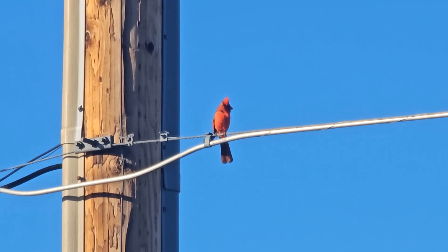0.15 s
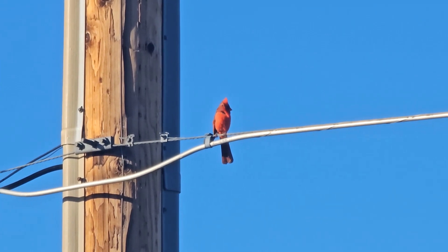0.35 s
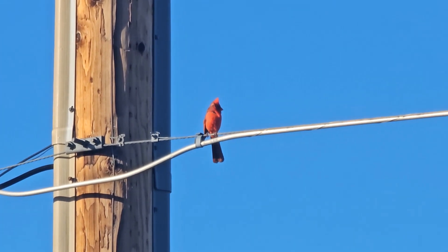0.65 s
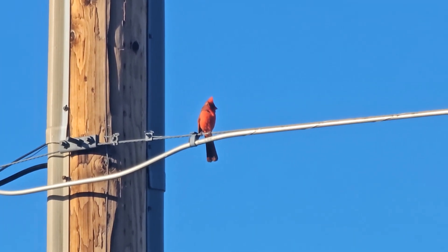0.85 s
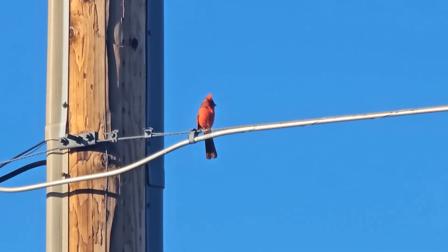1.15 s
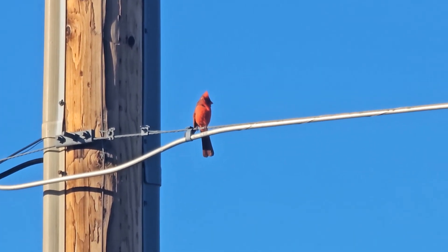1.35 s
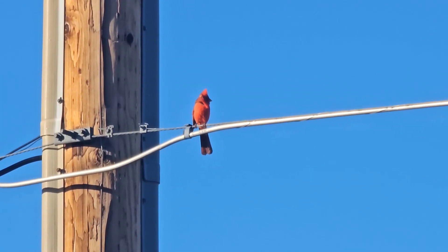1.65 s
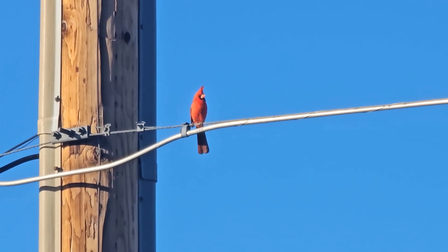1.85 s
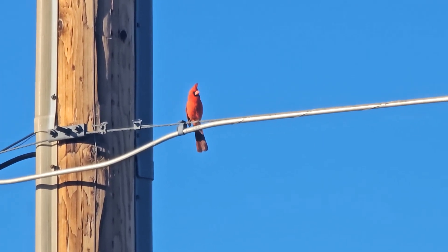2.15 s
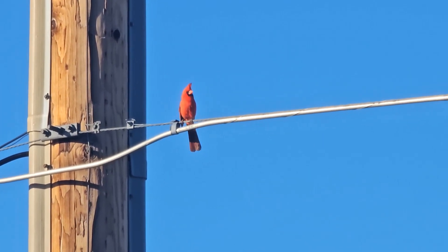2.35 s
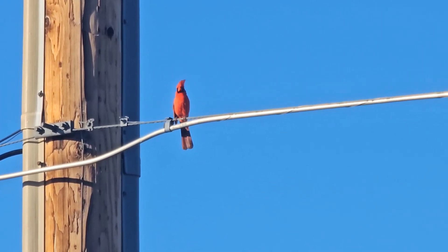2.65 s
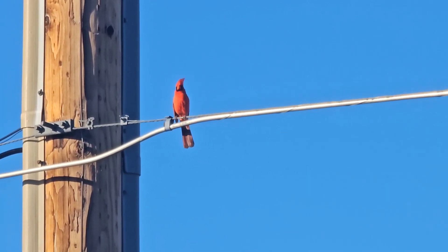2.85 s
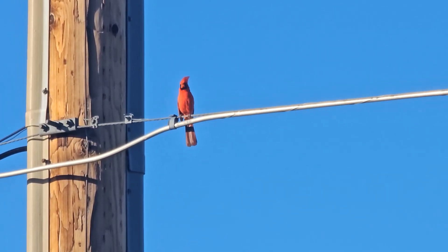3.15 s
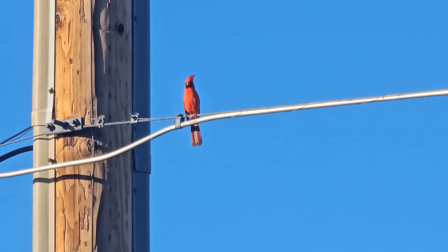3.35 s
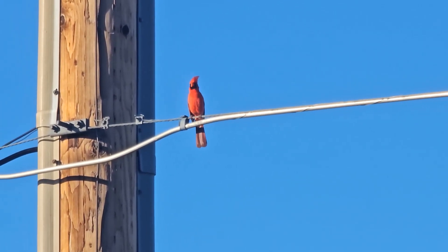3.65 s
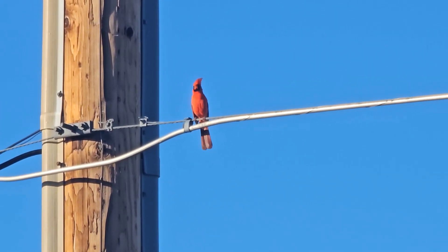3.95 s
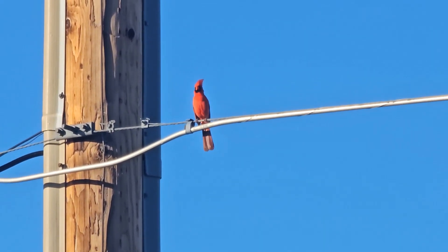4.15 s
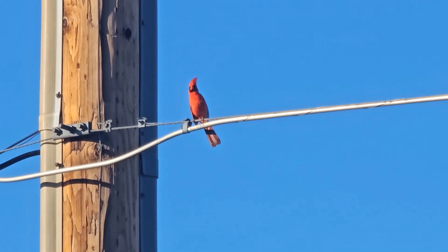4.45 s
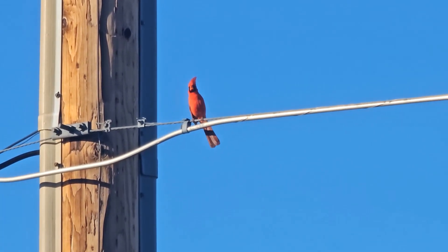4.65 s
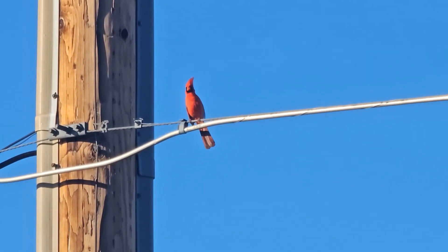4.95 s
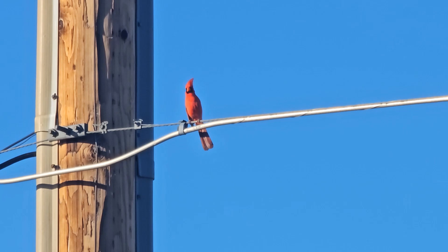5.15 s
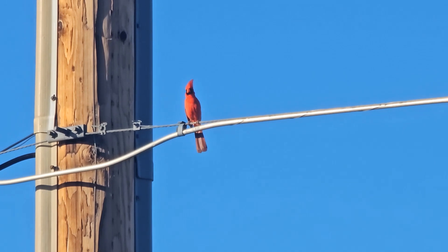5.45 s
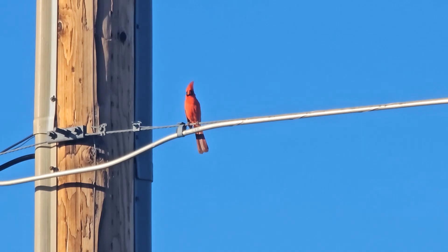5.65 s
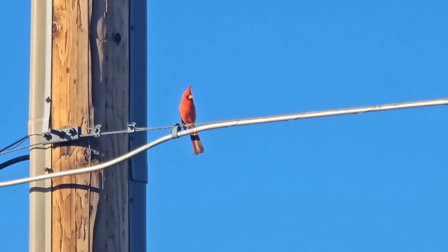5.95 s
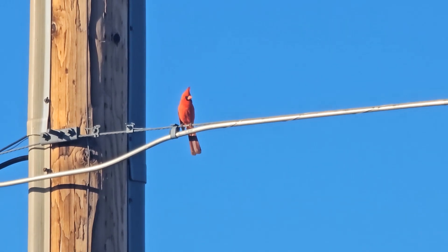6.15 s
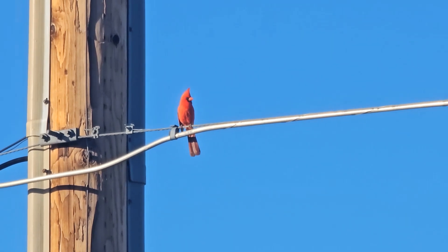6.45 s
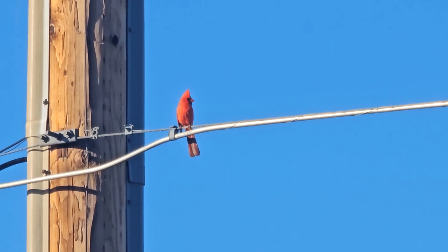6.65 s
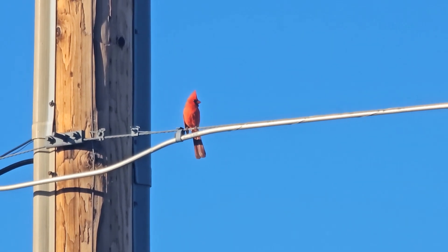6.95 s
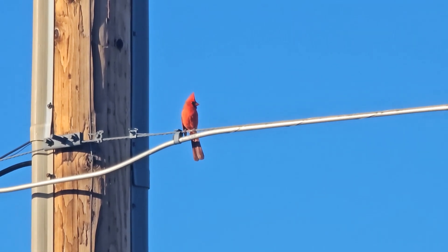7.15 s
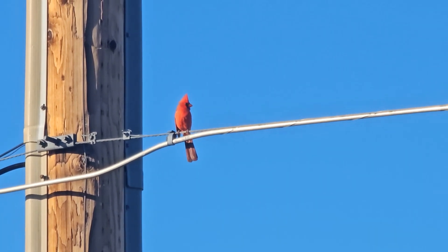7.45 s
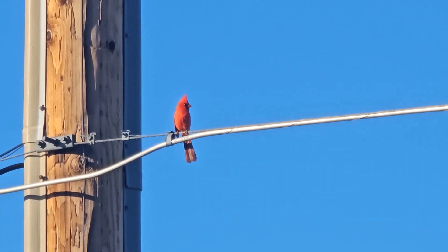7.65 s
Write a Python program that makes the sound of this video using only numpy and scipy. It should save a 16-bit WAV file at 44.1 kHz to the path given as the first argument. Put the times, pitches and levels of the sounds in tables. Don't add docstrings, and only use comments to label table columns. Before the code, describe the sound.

Outdoors, a low engine drone and distant traffic rumble while other birds twitter faintly far off and small ticks come from the handheld microphone. After about two seconds a cardinal gives three thin, high rising whistles, each louder, then ten bright down-slurred whistles, each with a sharp chip in front, about four per second. The song stops before six seconds, leaving soft rumble and distant twitter.

```python
import sys
import numpy as np
from scipy import signal
from scipy.fft import rfft, irfft, next_fast_len
from scipy.io import wavfile
from scipy.ndimage import uniform_filter1d

SR = 44100
rng = np.random.default_rng(int(sys.argv[2]) if len(sys.argv) > 2 else 0)


def nominal_scale(level):
    x = np.asarray(level, float) / 20
    return 10 ** x


def generate_wav(signal):
    frames = np.transpose(np.atleast_2d(signal))
    scaled = np.clip(frames, -1, 1) * 32767
    pcm = np.round(scaled).astype(np.int16)
    wavfile.write(sys.argv[1], SR, pcm)


N = 344421
FAST_N = next_fast_len(N, real=True)

# start_s, mark_hz, level_db
RISES = [
    (2.302, 5834, -44),
    (2.782, 6000, -39.5),
    (3.18, 6100, -36),
]
# start_s, mark_hz, level_db
HOOKS = [
    (2.612, 3666, -51),
    (3.008, 3717, -44),
]
# start_s, mark_hz, level_db
UNDERS = [(3.1, 2286, -53)]
# start_s, mark_hz, level_db
LEADS = [(3.368, 2906, -28.5), (3.613, 2840, -27)]
# start_s, mark_hz, level_db
SNAPS = [(3.309, 5034, -28), (3.546, 4960, -27.5)]
# start_s, mark_hz, level_db
ARCHES = [(3.856, 2835, -26), (4.091, 2844, -26), (4.326, 2763, -26), (4.56, 2808, -25.5),
          (4.795, 2795, -25), (5.029, 2812, -25.5), (5.263, 2789, -25.5), (5.5, 2750, -27.5)]
# start_s, mark_hz, level_db
CHIPS = [(3.783, 4090, -33.5), (4.023, 3940, -34), (4.256, 3940, -33.5), (4.491, 4060, -33),
         (4.726, 4040, -33), (4.958, 4100, -30.5), (5.193, 3990, -33), (5.43, 4010, -32.5)]
# from_mark_s, pitch_share, level_db
RISE_SHAPE = [
    (-.09, .635, -27.5),
    (-.06, .725, -14),
    (-.03, .825, -5),
    (0, 1, 0),
    (.022, 1.08, -2.5),
    (.042, 1.11, -23),
]
# from_mark_s, pitch_share, level_db
HOOK_SHAPE = [(0, 0.96, 3), (.008, 0.99, -6.5), (.028, .88, -2), (.043, .725, -6), (.056, .68, -9.5),
              (.066, 0.77, -10)]
# from_mark_s, pitch_share, level_db
UNDER_SHAPE = [(0, .9, -14), (.012, .93, -3), (.025, .97, -1), (.04, 1.05, -4), (.052, 1.08, -13)]
# from_mark_s, pitch_share, level_db
LEAD_SHAPE = [(-.074, .86, -29), (-.06, .83, -18.5), (-.046, .76, -21.5), (-.036, .73, -16),
              (-.028, .76, -11)]
# from_mark_s, pitch_share, level_db
SNAP_SHAPE = [(-.012, .74, -15), (-.006, .86, -10), (-.002, 0.99, -6), (.001, 0.97, 1), (.008, .97, -11),
              (.015, 0.82, -23), (.021, .8, -26)]
# from_mark_s, pitch_share, level_db
ARCH_SHAPE = [(-.048, 0.62, -35), (-.04, 0.67, -16), (-.02, .84, -8.5), (-.01, .935, -9.5),
              (-.002, 0.99, -2.5), (.01, 0.98, -8.5), (0.023, .84, -12), (.05, .667, -11.5),
              (.093, .485, -26)]
# from_mark_s, pitch_share, level_db
CHIP_SHAPE = [(-.013, .5, -21), (-.008, .68, -21.5), (-.004, 0.97, -10), (-.001, 1.012, 2.5),
              (.001, 1.15, -9.5), (.003, 1.3, -7.5), (.006, 1.5, -10.5), (.01, 1.53, -24.5)]
RISE_OVERTONES_DB = [-19.5, -52.5, -47, -60, -60, -60]
ARCH_OVERTONES_DB = [-40, -35.5, -56, -42, -56, -48.5]
CHIP_OVERTONES_DB = [-21, -25, -44, -65, -61, -65]
# overtones_db, flutter_share, breath_db
RISE_VOICE = (RISE_OVERTONES_DB, .006, -38)
SLUR_VOICE = (ARCH_OVERTONES_DB, .0049, -39)
SNAP_VOICE = (CHIP_OVERTONES_DB, .015, -33)
CHIP_VOICE = (CHIP_OVERTONES_DB, .07, -19)
# freq_hz, gain_db
BEAK = [(3000, 18.5), (4400, 11.5), (5100, 4), (6000, -17), (8500, -5.5), (11500, 0.2), (15000, -4.5)]
ECHO_MS = [3.1, 2.75]
ECHO_DB = [-5, -1]
# freq_hz, left_db, right_db, left_lead_rad
PORTS = [(1656, -2.5, -2, .01), (2900, 8, 7.5, .1), (4100, 3.5, 10.5, 2.2), (4800, 1.5, 8.5, 2.2),
         (5650, 3, -5.5, 2.2), (6620, 3, -10, 3.2), (8400, 6.5, -12, 3.6), (11600, -3.5, 8, 4),
         (15000, 1.5, 1, 2.8)]
# level_db, first_s, t60_s
YARD = [
    (-11.5, .004, .08),
    (-12.5, .015, .3),
    (-26, .05, 1.1),
]

# start_s,
# length_s, first_hz, last_hz, level_db
FAR = [(.058, .04, 4010, 4880, -63), (.1, 0.056, 4300, 3530, -64.5), (.662, .03, 4150, 3950, -62),
       (.705, .035, 3110, 3000, -62.5), (.728, .03, 4350, 4700, -62), (.735, .02, 3000, 2500, -62),
       (.768, 0.027, 2490, 3250, -56.5), (.792, 0.064, 3200, 2960, -59), (.775, .025, 4280, 4100, -62.5),
       (.805, .015, 4100, 4480, -61.5), (.905, 0.051, 2050, 3300, -61), (.965, .02, 2400, 3000, -59),
       (.983, 0.019, 3400, 5070, -56), (1.003, .012, 4910, 4060, -58.5), (1.012, .022, 3990, 4300, -56.5),
       (1.0, 0.084, 2900, 3300, -64), (1.12, .03, 2770, 2900, -63.5), (1.15, 0.048, 3100, 4700, -63),
       (1.212, .042, 4000, 3900, -60), (1.31, 0.035, 3550, 3400, -62.5), (1.35, .022, 3780, 4150, -59),
       (1.368, 0.019, 4070, 3880, -54.5), (1.378, .02, 3700, 3150, -63), (1.392, .025, 3150, 3150, -59.5),
       (1.42, .03, 2800, 3100, -64), (1.94, .02, 4300, 4800, -55.5), (1.96, 0.052, 4750, 4330, -58),
       (2.0, .045, 4100, 2960, -58), (2.06, .025, 3300, 3330, -61.5), (2.105, 0.027, 4400, 4250, -59),
       (2.125, .04, 3700, 2900, -57.5), (2.16, .025, 2610, 2580, -58.5), (2.15, .03, 4250, 3880, -60),
       (2.42, .03, 4400, 4700, -66), (2.45, .03, 4280, 4000, -62.5), (2.62, .025, 4100, 4400, -59),
       (2.66, 0.037, 3400, 2800, -53), (2.675, 0.022, 3600, 3700, -55),
       (3.7, .02, 4200, 4700, -53), (3.721, 0.046, 4600, 4100, -50), (3.891, 0.047, 4200, 3930, -50),
          (3.915, .04, 3700, 3200, -53), (4.618, .04, 3253, 3300, -53.5), (4.788, .04, 3099, 3438, -53),
          (5.105, .03, 4400, 4800, -54), (5.265, 0.032, 4300, 4700, -57), (5.296, .04, 4000, 4600, -53),
          (5.547, .03, 4900, 4400, -53), (5.9, .07, 4200, 4330, -68.5), (6.108, 0.055, 4700, 3280, -63.5),
          (6.159, .052, 3800, 2300, -63), (6.395, 0.11, 4250, 4150, -64.5), (6.471, 0.13, 4150, 4050, -65),
          (6.479, .04, 2300, 2900, -60), (6.515, 0.031, 2950, 3250, -57), (6.617, .09, 2200, 2300, -62),
          (6.672, 0.047, 2880, 2680, -54), (6.7, 0.053, 2900, 3820, -61), (6.729, .035, 4750, 4180, -62.5),
          (6.875, .05, 2600, 4300, -64), (6.884, 0.066, 2900, 2860, -63), (7.215, .04, 4550, 4350, -61),
          (7.242, .02, 4100, 4460, -59), (7.275, .03, 3900, 4050, -61), (7.38, .04, 2500, 3060, -63),
          (7.415, 0.066, 3050, 2200, -62.5), (7.42, .05, 3000, 3000, -62),
          (7.542, 0.029, 4400, 5400, -62.5)]
# start_s, length_s, first_hz, last_hz, level_db
TUMBLE = [(7, .02, 4320, 4800, -58), (7.018, .02, 3765, 5240, -53), (7.038, .012, 5000, 3900, -50),
          (7.048, .012, 4180, 4400, -49), (7.05, 0.051, 4050, 3980, -50), (7.074, .03, 3990, 3050, -48.5),
          (7.034, 0.04, 3450, 3330, -58), (7.064, .03, 2470, 3400, -58), (7.065, .04, 4580, 4500, -58),
          (7.096, .03, 3090, 3700, -54), (7.125, .04, 4510, 4920, -57), (7.13, .03, 2800, 3780, -52.5),
          (7.153, .02, 3200, 2770, -57), (7.166, .02, 3750, 3600, -54.5), (7.179, .05, 2950, 3050, -62.5)]
# start_s, gap_s, low_hz, high_hz, level_db
TRILL = (6.7, .021, 2300, 2900, -63)
# level_db, first_s, t60_s
FAR_YARD = [
    (-6, .003, .07),
    (-5, .02, .33),
]

# start_s, peak_db, left_right_db
TICKS = [(0.14, -47, 4), (.6808, -53, 5), (.9009, -57, -10), (1.1523, -56, -0.5), (1.063, -57, 0),
         (1.257, -47.5, 1.5), (1.4108, -50.5, 7), (1.5454, -39, 6.5), (1.763, -42.5, 18.5),
         (1.774, -51.5, -7), (1.87, -47.5, -2.5), (1.8856, -44.5, -10), (2.147, -53, -0.5),
         (2.4668, -48, -6), (2.497, -49, 2), (2.6045, -54.5, 13), (2.6259, -52.5, -3), (2.6543, -40.5, -7),
         (2.9175, -37, -0.5), (2.949, -53, 3), (2.9944, -41.5, -5), (3.6698, -54.5, 2), (3.7487, -29, -4),
         (3.795, -30, -1), (4.107, -41.5, 0), (4.477, -40.5, -5), (4.8494, -48.5, -2), (5.08, -52.5, -3),
         (5.458, -33.5, 4), (6.0147, -59, 0), (6.065, -57, -9), (6.8815, -54.5, -6), (6.9997, -57, 8.5),
         (7.4896, -53, 2.5)]
# freq_hz, width_hz, level_db
SHELL = [(4700, 900, -4), (6060, 570, -4), (12000, 1200, 4.5), (13400, 1500, -9)]
# start_s, freq_hz, level_db, t60_s
PINGS = [(.684, 6050, -58.5, 0.26), (.902, 6050, -66, .05), (1.845, 6030, -62, 0.47),
         (3.671, 6050, -52, 0.19), (6.016, 5980, -68, 0.13)]
# time_s, level_db
RUSTLE = [(0, -78), (.6, -78), (1.6, -75.5), (3.7, -73.5), (5.5, -79.5), (5.75, -82.5), (7.81, -85.5)]
# freq_hz, density_db
FIZZ = [(3000, -27.5), (5000, 2), (5700, -11), (6300, -12), (7000, -14.5), (10500, -15), (11400, -7.5),
        (14000, -10.5), (15700, -12.5), (16000, -29.5)]

# time_s, pitch_hz, level_db
ENGINE = [(0, 80.08, -31), (.57, 79.58, -35), (.78, 84.43, -24.5), (1.28, 92.38, -21), (1.48, 91.58, -34),
          (1.65, 93.56, -22), (2.06, 93.9, -25.5), (2.2, 94.95, -36), (2.72, 96.96, -39),
          (2.78, 96.47, -19.5), (2.96, 96.7, -27), (3.04, 96.9, -21.5), (4.07, 98.38, -20.5),
          (5.0, 100.7, -29), (5.35, 100.1, -26), (5.46, 100.7, -45.5), (7.0, 104.1, -30),
          (7.81, 105.1, -45.5)]
# multiple, level_db under the drone
ORDERS_DB = [(1.5, -20.5), (2, -26)]
# multiple, level_db
HUM = [(1, -39), (2, -44.5), (3, -44.5), (5, -63), (6, -63.5), (7, -63)]

# time_s, level_db
TRAFFIC = [(0, -49.5), (1.0, -47.5), (1.7, -49), (4.3, -43.5), (5.4, -47.5), (5.9, -51), (7.0, -47),
           (7.81, -52.5)]
# freq_hz, density_db
AIR = [(12, -50.5), (20, -17), (56, 0.5), (93, -3), (221, -13.5), (300, -22.5), (432, -28), (755, -24),
       (918, -32.5), (1280, -33.5), (1610, -45), (4390, -48.5), (5800, -70), (11700, -74.5), (15900, -70)]
# freq_hz, likeness_0_to_1, left_lead_rad, left_right_db
PAIR = [(60, 0.98, 0.15, 0.2), (290, 0.97, 0.46, 1), (820, 0.52, 0.98, 1), (2300, 0.29, 6.33, 2.5),
        (4400, 0.37, 8.9, -12), (6100, .3, 7.1, 6), (7900, 0.18, 9.5, 15.5), (11600, .3, 7.7, -4.5),
        (15000, .3, 5.8, -5)]


def singer():
    kinds = (
        (RISES, RISE_SHAPE, RISE_VOICE),
        (HOOKS, HOOK_SHAPE, SLUR_VOICE),
        (LEADS, LEAD_SHAPE + ARCH_SHAPE[2:], SLUR_VOICE),
        (UNDERS, UNDER_SHAPE, SLUR_VOICE),
        (SNAPS, SNAP_SHAPE, SNAP_VOICE),
        (ARCHES, ARCH_SHAPE, SLUR_VOICE),
        (CHIPS, CHIP_SHAPE, CHIP_VOICE),
    )
    song = np.zeros(N)
    for marks, shape, voice in kinds:
        for start_s, mark_hz, level_db in marks:
            contour = np.array(shape) * [1, mark_hz, 1] + [start_s, 0, level_db]
            add(song, *whistle(contour, *voice))
    return filtered(filtered(song, ground) + tail(song, YARD), ports)


def whistle(contour, overtones_db, flutter_share, breath_db):
    s, hz, db = np.transpose(sorted(map(tuple, contour)))
    t = np.arange(s[0], s[-1], 1 / SR)
    hz, db = (uniform_filter1d(np.interp(t, s, c), size=len(t) // 24, mode="nearest") for c in (hz, db))
    flutter = evened(uniform_filter1d(rng.standard_normal(SR // 4), size=30))[:len(t)]
    phase = 2 * np.pi * np.cumsum(hz * (1 + flutter_share * flutter)) / SR
    breath = signal.lfilter([1, -1], [1, -1.1, .55], rng.standard_normal(SR // 4))[:len(t)]
    tone = np.sin(phase) + nominal_scale(breath_db) * breath
    for k, overtone_db in enumerate(overtones_db, start=2):
        gain = nominal_scale(overtone_db + read(BEAK, k * hz)[0])
        tone += gain * np.sin(k * phase) * (k * hz < SR / 2)
    return s[0], np.sqrt(2) * nominal_scale(db) * tone * signal.windows.tukey(len(t), .1)


def ground(hz):
    return 1 + nominal_scale(np.c_[ECHO_DB]) * np.exp(-2j * np.pi * hz * np.c_[ECHO_MS] * 1e-3)


def ports(hz):
    left_db, right_db, lead_rad = read(PORTS, hz)
    return np.array([nominal_scale(left_db) + 0j, nominal_scale(right_db) * np.exp(-1j * lead_rad)])


def far_birds():
    dry_db, warble_share, throb_db = 1, .011, 2.5
    chatter_count, chatter_db = 110, -70
    low = [0, .02, 2400, 2400, chatter_db - 8]
    high = [N / SR - .1, .07, 4900, 4900, chatter_db - 4]
    chatter = rng.uniform(low, high, (chatter_count, 5))
    calls, warble, throb = np.zeros(N), drift(160), drift(70)
    for start_s, length_s, first_hz, last_hz, level_db in [*far_notes(), *chatter]:
        u = np.linspace(0, 1, round(length_s * SR))
        glide_hz = first_hz + (last_hz - first_hz) * u
        hz = glide_hz * (1 + warble_share * warble[round(start_s * SR):][:len(u)])
        note = np.sin(2 * np.pi * np.cumsum(hz) / SR) * np.sin(np.pi * u) ** 0.52
        add(calls, start_s, nominal_scale(level_db) * note)
    calls = calls * nominal_scale(throb_db * throb)
    heard = nominal_scale(dry_db) * calls + tail(calls, FAR_YARD)
    return filtered(heard, lambda hz: nominal_scale(np.c_[[.5, -.5]] * read(PAIR, hz)[-1]))


def far_notes():
    start_s, gap_s, low_hz, high_hz, level_db = TRILL
    run = []
    for k in range(8):
        first_hz, last_hz = [low_hz, high_hz][::(-1) ** k]
        run.append((start_s + k * gap_s, 1.6 * gap_s, first_hz, last_hz, level_db))
    scatter = .04 * np.array([0.0029, 1.8, 1.1, 1.03, 0.65])
    run = np.array(run) * (1 + scatter * rng.standard_normal((len(run), 5)))
    return FAR + TUMBLE + list(run)


def ticks():
    out, t = np.zeros((2, N)), np.arange(3000) / SR
    ring_t = t[:300]
    modes = sum(nominal_scale(db - 60 * ring_t * width_hz / 3.1) * np.sin(2 * np.pi * hz * ring_t)
                for hz, width_hz, db in SHELL)
    decay = nominal_scale(-60 * t / .003) + nominal_scale(-10 - 60 * t / 0.06)
    for start_s, peak_db, pan_db in TICKS:
        a, b = rng.standard_normal((2, len(t)))
        burst = np.array([a, 0.84 * b - 0.53 * a])
        tick = signal.fftconvolve(burst * decay, modes[None], axes=1)
        add(out, start_s, nominal_scale(peak_db) * tick / abs(tick).max() * nominal_scale([[pan_db / 2], [-pan_db / 2]]))
    return out


def metal_pings():
    out, t = np.zeros((2, N)), np.arange(SR // 4) / SR
    for start_s, hz, level_db, t60_s in PINGS:
        ping = nominal_scale(level_db - 60 * t / t60_s) * np.sin(2 * np.pi * hz * t)
        add(out, start_s, ping * nominal_scale([[3], [-6]]))
    return out


def rustle():
    snaps_per_s, snap_decay_s, stir_db, stir_s = 25, .003, 4.5, 0.015
    t = np.arange(N) / SR
    snaps = (rng.random(N) < snaps_per_s / SR) * nominal_scale(6.4 * np.minimum(rng.exponential(1, N), 3))
    crackle = 1 + .4 * signal.lfilter([1], [1, -np.exp(-1 / (snap_decay_s * SR))], snaps)
    s, db = np.transpose(RUSTLE)
    level_db = np.interp(t, s, db) + 7.5 + 2.2 * drift(25)
    for tick_s, *_ in TICKS:
        level_db += stir_db * np.exp(-((t - tick_s) / stir_s) ** 2)
    return nominal_scale(level_db) * crackle * noise(FIZZ, patchy_db=2)


def engine():
    steady_db, gust_share = -29, 0.59
    t = np.arange(N) / SR
    s, hz, db = np.transpose(ENGINE)
    phase = 2 * np.pi * np.cumsum(np.interp(t, s, hz)) / SR
    orders = sum(nominal_scale(o_db + 3.55 * drift(3.4)) * np.sin(k * phase) for k, o_db in ORDERS_DB)
    level_db = np.interp(t, s, db)
    gust = np.clip(drift(4.5), -2, 1)
    level_db = level_db + gust_share * np.maximum(steady_db - level_db, 0) * gust
    return left_first(nominal_scale(level_db) * (np.sin(phase) + orders))


def machine_hum():
    base_hz = 68.58
    t, hum = np.arange(N) / SR, np.zeros(N)
    for k, level_db in HUM:
        hum += nominal_scale(level_db + 2.2 * drift(1.6)) * np.sin(2 * np.pi * (k * base_hz * t + rng.random()))
    return left_first(hum)


def left_first(x):
    x = np.sqrt(2) * x
    return np.array([x * nominal_scale(-2.5), np.roll(x, shift=14) * nominal_scale(-3.5)])


def traffic():
    air_db = -29.5
    s, db = np.transpose(TRAFFIC)
    swell_db = np.interp(np.arange(N) / SR, s, db - np.mean(db)) * 0.54 + 0.43 * drift(1.7)
    return nominal_scale(air_db - 3 + swell_db) * noise(AIR, patchy_db=2.5)


def noise(shape_db, patchy_db):
    hz = np.fft.rfftfreq(1024, 1 / SR)
    a, b, c, d, patches = rng.standard_normal((N // 256 + 5, 513, 5)).T
    patches = evened(uniform_filter1d(uniform_filter1d(patches, 14, 0), 12, 1))
    same, lead_rad, pan_db = (v[:, None] for v in read(PAIR, hz))
    same = np.clip(same, 0, 1)
    left = a + 1j * b
    right = same * left * np.exp(-1j * lead_rad) + np.sqrt(1 - same ** 2) * (c + 1j * d)
    z = np.array([left * nominal_scale(pan_db / 2), right * nominal_scale(-pan_db / 2)])
    z *= nominal_scale(read(shape_db, hz)[0][:, None] + patchy_db * patches)
    return evened(signal.istft(z, nperseg=1024, noverlap=768)[1][:, :N])


def tail(x, rooms):
    t, taps = np.arange(SR) / SR, np.zeros((2, SR))
    for level_db, first_s, t60_s in rooms:
        hits = rng.standard_normal((2, SR)) * (rng.random((2, SR)) < .04)
        part = hits * nominal_scale(-60 * t / t60_s) * (t > first_s)
        taps += nominal_scale(level_db) * part / np.linalg.norm(part[0])
    return signal.fftconvolve(x[None], taps, axes=1)[:, :N]


def drift(rate_hz):
    step_hz = 400
    steps = rng.standard_normal(int(N / SR * step_hz) + 2)
    z = rfft(steps) / (1 + (np.fft.rfftfreq(len(steps), 1 / step_hz) / rate_hz) ** 4)
    slow = irfft(z, len(steps))
    return evened(np.interp(np.arange(N) / SR * step_hz, np.arange(len(steps)), slow))


def filtered(x, gain):
    return irfft(rfft(x, FAST_N) * gain(np.fft.rfftfreq(FAST_N, 1 / SR)), FAST_N)[..., :N]


def read(points, hz):
    f, *columns = np.transpose(points)
    return [np.interp(np.log(hz + 1), np.log(f + 1), c) for c in columns]


def evened(x):
    return x / np.sqrt(np.mean(x ** 2) + 1e-20)


def add(mix, start_s, sound):
    part = mix[..., round(start_s * SR):][..., :sound.shape[-1]]
    part += sound[..., :part.shape[-1]]


def scene():
    handling = ticks() + metal_pings() + rustle()
    motors = engine() + machine_hum()
    return singer() + far_birds() + handling + motors + traffic()


def top_cut(x):
    return signal.sosfilt(signal.butter(12, 15800, fs=SR, output="sos"), x)


def record(dry):
    bass_cut = signal.butter(3, 38, "highpass", fs=SR, output="sos")
    mix = signal.sosfilt(bass_cut, dry)
    mix = filtered(mix, lambda hz: hz < 15800)
    return top_cut(mix)


dry = scene()
out = record(dry)
generate_wav(out)
```